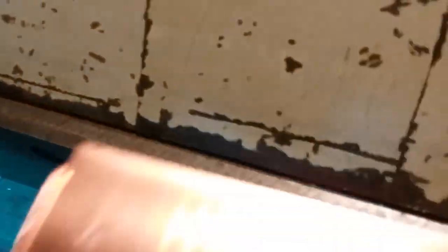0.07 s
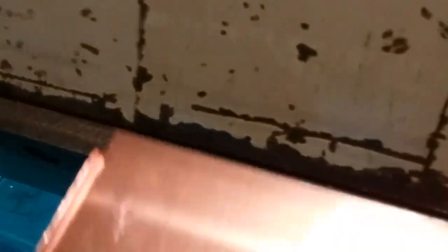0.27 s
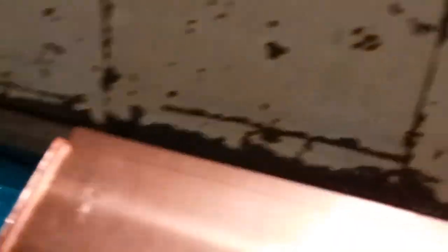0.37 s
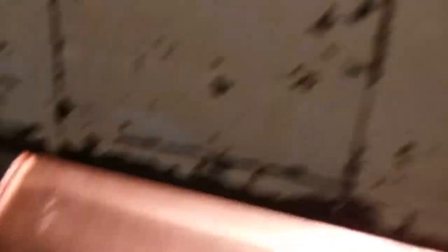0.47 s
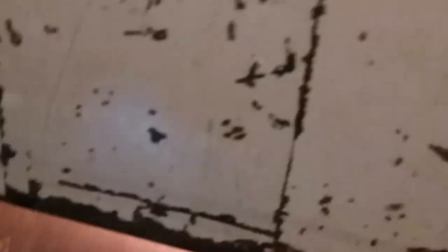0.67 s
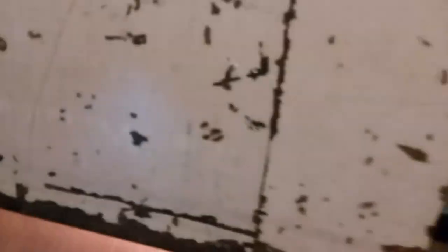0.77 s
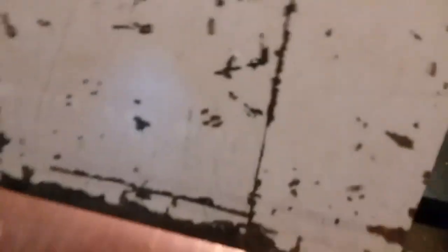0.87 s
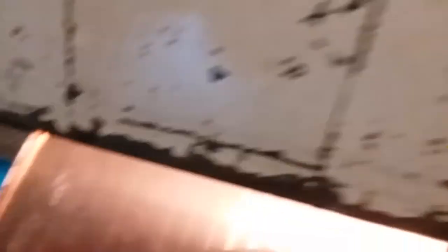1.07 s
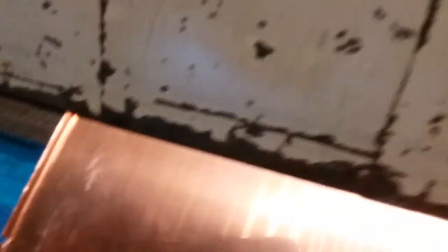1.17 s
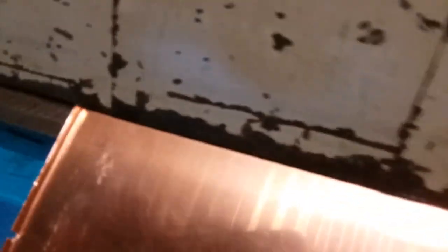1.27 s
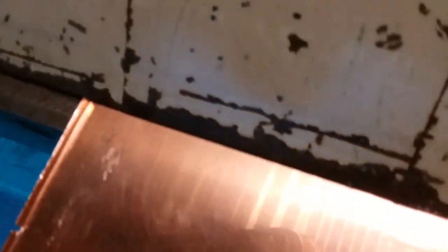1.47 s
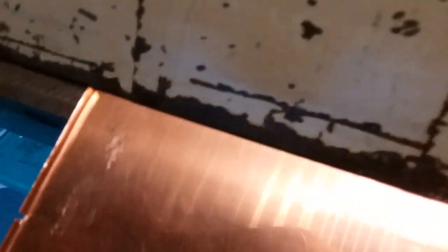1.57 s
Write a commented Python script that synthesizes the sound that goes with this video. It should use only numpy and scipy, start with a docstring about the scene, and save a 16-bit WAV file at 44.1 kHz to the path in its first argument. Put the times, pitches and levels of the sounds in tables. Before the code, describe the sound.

Copper sheet clanks and clatters loudly against a steel bending machine, with brief scrapes and dull knocks.

```python
"""Copper sheet into a bending brake

A copper sheet is slid into a bending brake in a small workshop, close to the microphone.
Its edge scrapes over the steel bed (tiny random slips); it clatters down and clanks against the clamp
(contact pulses, dense noise rings and decaying modes) and booms as it flexes (sagging sines).
A last light blow seats it; a few soft, duller knocks follow over faint rumble and hiss."""
import sys
import numpy as np
from scipy import signal
from scipy.fft import rfft, irfft
from scipy.io import wavfile
from scipy.ndimage import uniform_filter1d

SR = 44100
rng = np.random.default_rng(int(sys.argv[2]) if len(sys.argv) > 2 else 0)


def bounce(signal):
    """Save signal as a 16-bit WAV file at the path given by the first command-line argument."""
    frames = np.transpose(np.atleast_2d(signal))
    limited = np.clip(frames, -1, 1)
    pcm = np.round(limited * 32767).astype(np.int16)
    wavfile.write(sys.argv[1], SR, pcm)


N = 70560  # samples in the scene
SIZE = 32768  # samples in one struck sound
HZ, T = np.fft.rfftfreq(SIZE, 1 / SR), np.arange(SIZE) / SR
STRIKE_RISE_S, FLEX_RISE_S = 0.0003, 0.0024  # time constants of a hard and of a soft onset


def amp(db):
    """Decibels to gain."""
    return 10 ** (np.asarray(db) / 20)


def read(points, hz):
    """A table's value on a log-frequency axis."""
    f, value = np.transpose(points)
    return np.interp(np.log(hz + 1), np.log(f + 1), value)


def add(mix, s, sound):
    """Mixes a sound in at a time in seconds, cut off where the scene ends."""
    start = max(round(s * SR), 0)
    part = mix[:, start:][:, :sound.shape[1]]
    part += sound[:, :part.shape[1]]


def coloured(x, db):
    """Causal minimum-phase filter with gain db at each of HZ."""
    log_gain = np.log(amp(db))
    circle = np.concatenate([log_gain, log_gain[..., -2:0:-1]], -1)
    response = np.exp(np.conj(signal.hilbert(circle)))
    taps = np.fft.ifft(response).real[..., :SIZE // 8]
    return signal.fftconvolve(x, np.atleast_2d(taps), axes=1)[:, :x.shape[1]]


# How alike the two microphones hear a sound. Each row: frequency in Hz, likeness from 0 to 1.
LIKENESS = [(100, 1), (400, 0.77), (900, 0.48), (1600, 0.051), (3000, 0.016), (15000, 0.045)]
ROOM_LIKENESS = 0.88  # factor on the likeness for the room


def noise_pair(size, likeness):
    """Spectra of white noise at two microphones, most alike in the bass."""
    a, b = rfft(rng.standard_normal((2, size)))
    shared = np.clip(likeness * read(LIKENESS, np.fft.rfftfreq(size, 1 / SR)), 0, 1)
    return np.array([a, shared * a + np.sqrt(1 - shared ** 2) * b])


def dense_ring(t60_of, rise_s, db, likeness=1, flutter_db=0, count=8):
    """Countless close modes as noise: each band dies at its own rate, the whole has the spectrum db."""
    noise, centres = noise_pair(SIZE, likeness), np.geomspace(100, 14000, count)
    x = 0
    for centre, weights in zip(centres, np.eye(count)):
        band = irfft(noise * read(np.c_[centres, weights], HZ))
        x = x + band * amp(-60 * T / max(t60_of(centre), 0.005))
    flutter = uniform_filter1d(rng.standard_normal(SIZE), size=120)
    onset = 1 - np.exp(-T / max(rise_s, 1 / SR))
    x = x * onset * amp(flutter_db * flutter / flutter.std())
    # Level the smoothed spectrum before colouring, with wider smoothing towards the treble.
    power = abs(rfft(x)) ** 2
    narrow, wide = uniform_filter1d(power, size=160), uniform_filter1d(power, size=800)
    share = np.minimum(HZ / 4000, 1)
    smooth = abs((1 - share) * narrow + share * wide)
    return coloured(x, db - 10 * np.log10(smooth + 1e-12))


def modes(table, colour):
    """Decaying partials of one object, each as strong as the blow is at its pitch."""
    out = np.zeros((2, SIZE))
    for hz, db, t60 in table:
        rate = np.log(1000) / t60
        phase, apart = rng.uniform(-np.pi, np.pi, 2)
        phases = phase + np.array([[0], [apart * (1 - read(LIKENESS, hz))]])
        # The root keeps a partial's energy the same however long it rings.
        level = amp(db + read(colour, hz)) * 2 * np.sqrt(rate / SR)
        out += level * np.exp(-rate * T) * np.sin(2 * np.pi * hz * T + phases)
    return out


# How long a blow's crash hangs on, by pitch. Each row: frequency in Hz, factor on the blow's ring time.
RING_SCALE = [(100, 3.2), (400, 0.89), (1500, 1.3), (4000, 1.2), (14000, 0.73)]
CONTACT_HZ = 3400  # corner above which the contact pulse loses treble
UNEVEN_DB = 2  # each spot that is struck favours some modes and starves others
RATTLE_DB = 1  # loose contacts make the crash flutter


def strike(colour, contact_db, t60, room_db):
    """The contact pulse, a hand-damped crash of metal and its echo."""
    db = read(colour, HZ)
    contact_colour = db + contact_db - 10 * np.log10(1 + (HZ / CONTACT_HZ) ** 2)
    contact = coloured(signal.unit_impulse((1, SIZE)), contact_colour)
    uneven = uniform_filter1d(rng.standard_normal(len(HZ)), size=50)
    uneven = uniform_filter1d(uneven, size=50)
    crash_colour = db + UNEVEN_DB * uneven / uneven.std()
    crash = dense_ring(lambda f: t60 * read(RING_SCALE, f), STRIKE_RISE_S, crash_colour,
                       flutter_db=RATTLE_DB)
    return contact + crash + workshop(db + room_db)


# Pitches in Hz at which the levels of a blow or a knock are given.
BLOW_HZ = [130, 300, 900, 1500, 2500, 3600, 13000]
# Blows of the sheet. Each row: start in seconds, seven levels in dB (one for each of BLOW_HZ),
# then, relative to those, contact pulse in dB, ring t60 in seconds before RING_SCALE,
# sheet modes in dB, clamp modes in dB, room in dB.
BLOWS = [ (0.2059, 15.5, 11, 10.5, 14, 5, 3, 5.5, -2.5, 0.028, 2, -10, -23),
         (.2140, 11.5, 10, 0.5, 7.5, 5.5, 9.5, 4.5, -8, 0.089, -3, -42, -12),
         (.2270, 2.5, 14, 12, 12, 15, 11, 10, -17.5, 0.13, -2, -12, -15),
         (.2640, 0, 3.5, 9.5, 5, 2.5, -8, -29, -32, 0.049, -20.5, -33, -14.5),
         (0.3546, -2, 7.5, 11.5, 10.5, 10, 0.5, -17, 0, 0.059, -15.5, 2.5, -4),
         (.4510, 5.5, 7, -3, -11, -15, -25.5, -38, -9, 0.48, -21, -15, 2.5),
         (0.5139, 2.5, 9.5, 4.5, 2, 5.5, -12, -15, -4, 0.052, -3, -0.5, -5.5),
         (0.6064, 1, -0.5, -7, -15.5, -14, -20, -37, -22, 0.012, -6, -6, -11),
         (0.8839, -6, 4.5, -5.5, 0.5, -10, -7.5, -11, -27, 0.056, -18, -19, -12.5),
         (0.998, -10, -4, -7.5, -16.5, -19.5, -28.5, -41.5, -7.5, 0.042, -6.5, -1, -13.5)]
# Modes of the sheet. Each row: pitch in Hz, energy in dB relative to the blow, t60 in seconds.
SHEET_MODES = [(134, -30.5, .2), (263, -23.5, 0.1), (311, -26, 0.14), (381.5, -21, 0.15), (843, -22, .2),
               (895, -23.5, 0.33), (994, -19.5, 0.074), (1935, -15, 0.056), (2103, -14.5, 0.06),
               (2980, -15.5, 0.09), (3330, -17.5, .1), (4528, -15, 0.23), (6850, -18, 0.13),
               (7870, -18.5, .075), (14900, -17.5, .08)]
# Modes of the steel clamp. Each row: pitch in Hz, energy in dB relative to the blow, t60 in seconds.
CLAMP_MODES = [(593.6, -26, 0.32), (956, -18.5, 0.1), (1791, -17, 0.049), (2114, -26, 0.15),
               (2940, -20, 0.09)]


def sheet_blows():
    """The sheet lands, bounces and flexes, ringing itself and the clamp."""
    out = np.zeros((2, N))
    for s, *levels, contact_db, t60, sheet_db, clamp_db, room_db in BLOWS:
        colour = np.c_[BLOW_HZ, levels]
        sheet = amp(sheet_db) * modes(SHEET_MODES, colour)
        clamp = amp(clamp_db) * modes(CLAMP_MODES, colour)
        add(out, s, strike(colour, contact_db, t60, room_db) + sheet + clamp)
    return out


# Short slaps of the rebounding edge. Each row: start in seconds, level in dB.
REBOUNDS = [(0.207, 10.5), (.2272, 11.5), (0.2814, -7), (.731, -20), (0.8828, -6), (0.927, -17),
            (1.036, -20)]
# Tone of the hardest slap. Each row: frequency in Hz, gain in dB.
REBOUND_COLOUR = [(300, 0.5), (1000, 0), (2400, -3), (4500, -15.5), (13000, -19.5)]
REBOUND_CONTACT_DB, REBOUND_ROOM_DB = -7, -13.5
REBOUND_T60 = 0.03  # s, before RING_SCALE
REBOUND_DULLING = 0.27  # dB per octave of treble lost for each dB that a slap is softer
DULL_FROM_HZ = 1000


def rebounds():
    """The loose edge slaps back and chatters between the blows; the gentler the slap, the duller."""
    out, hardest_db = np.zeros((2, N)), max(db for s, db in REBOUNDS)
    for s, db in REBOUNDS:
        dulling = REBOUND_DULLING * (hardest_db - db)  # dB per octave
        colour = [(hz, level + db - dulling * np.log2(max(hz / DULL_FROM_HZ, 1)))
                  for hz, level in REBOUND_COLOUR]
        add(out, s, strike(colour, REBOUND_CONTACT_DB, REBOUND_T60, REBOUND_ROOM_DB))
    return out


# Strongest partial of a struck spot. Each row: start in seconds, pitch in Hz, level in dB, t60 in seconds.
CLINKS = [(0.3541, 1436, -11.5, 0.041), (0.5143, 2483, -25.5, 0.1), (.5144, 1964, -37, 0.15),
          (.885, 890, -38, 0.1), (0.887, 1443, -40.5, .06), (1.395, 1494, -53.5, 0.056)]
CLINK_LEAD_RAD = 0.61  # phase by which the left microphone leads


def clinks():
    """A hard contact sets one partial of the struck spot ringing above the rest."""
    out, lead = np.zeros((2, N)), np.array([[CLINK_LEAD_RAD], [0]])
    onset = 1 - np.exp(-T / STRIKE_RISE_S)
    for s, hz, db, t60 in CLINKS:
        add(out, s, amp(db - 60 * T / t60) * onset * np.sin(2 * np.pi * hz * T + lead))
    return out


# Blurred rings of the flexing sheet.
# Each row: start in seconds, pitch in Hz before it sags, level in dB, t60 in seconds.
SHIMMERS = [(.356, 2010, -34.5, .3), (0.5143, 2560, -39, 0.25), (.607, 2577, -61.5, 1.2),
            (.607, 605, -55, 1.45)]
SHIMMER_OCTAVES = 0.18  # distance from the centre at which the band has dropped to 1/e
SHIMMER_SAG, RELAX_S = 0.18, 0.054  # share by which the pitch falls, time constant of the fall


def shimmers():
    """A cluster of close partials rings on as one blurred band, sagging as the sheet relaxes."""
    out = np.zeros((2, N))
    for s, hz, db, t60 in SHIMMERS:
        octaves = np.log2((HZ + 1) / hz)
        spectrum = noise_pair(SIZE, 0.93) * np.exp(-(octaves / SHIMMER_OCTAVES) ** 2)
        band = signal.hilbert(irfft(spectrum))
        sag_hz = hz * SHIMMER_SAG * (1 - np.exp(-T / RELAX_S))
        ring = (band * np.exp(-2j * np.pi * np.cumsum(sag_hz) / SR)).real
        envelope = amp(db - 60 * T / t60) * (1 - np.exp(-T / FLEX_RISE_S))
        add(out, s, ring / ring.std() * envelope)
    return out


# Low booms as the sheet flexes.
# Each row: start in seconds, pitch in Hz before it sags, level in dB, t60 in seconds.
BOOMS = [(0.4509, 246, -18, 0.039), (0.465, 295, -35, 0.07), (0.4976, 236, -20.5, 0.045),
         (0.514, 214.2, -37.5, 0.37), (.886, 151, -38, 0.11), (0.892, 348, -33.5, 0.029),
         (0.9989, 252, -50, 0.16), (1.2439, 257.6, -46, 0.083)]
BOOM_SAG_PER_S = 1.152  # exponential rate at which the pitch falls


def booms():
    """The whole sheet bows and springs back, its pitch sagging as it relaxes."""
    out = np.zeros((2, N))
    for s, hz, db, t60 in BOOMS:
        turns = np.cumsum(hz * np.exp(-BOOM_SAG_PER_S * T)) / SR
        envelope = amp(db - 60 * T / t60) * (1 - np.exp(-T / FLEX_RISE_S))
        add(out, s, (envelope * np.sin(2 * np.pi * turns))[None])
    return out


# Scrapes of the sheet's edge. Each row: loudest moment in seconds, swell and fade time constants
# in seconds, level in dB, treble tilt in dB per octave.
SCRAPES = [(.001, 0.027, 0.024, -41.5, -2), (0.096, 0.037, 0.031, -43, -2.5),
           (0.13, 0.05, 0.026, -40.5, 1.5), (0.501, 0.004, 0.017, -40.5, 1),
           (0.602, 0.0065, 0.0042, -43, -1.5)]
# Tone of a scrape before its tilt. Each row: frequency in Hz, gain in dB.
SCRAPE_COLOUR = [(400, 5), (1000, 4), (2800, 4.5), (4500, -0.5), (8000, -2.5), (15000, -5)]
SCRAPE_T60, SCRAPE_ROOM_DB = 0.026, -9.5  # ring of each slip in s, level of the echo
TILT_FROM_HZ, TILT_PIVOT_HZ = 1000, 4000  # the tilt acts from here up, and is 0 dB at the pivot
SLIPS_PER_S, SLIP_SPREAD_DB = 2800, 2  # mean rate of slips, scale of their random extra level


def scrapes():
    """The edge slips over the bed in thousands of tiny catches a second, each ringing briefly."""
    out, t = np.zeros((2, N)), np.arange(N) / SR
    tilt_octaves = np.log2(np.maximum(HZ, TILT_FROM_HZ) / TILT_PIVOT_HZ)
    for s, swell_s, fade_s, db, tilt_db in SCRAPES:
        slips = (rng.random(N) < SLIPS_PER_S / SR) * rng.standard_normal(N)
        slips = slips * amp(SLIP_SPREAD_DB * np.minimum(rng.exponential(1, N), 4))
        stroke = amp(db) * np.exp(-np.maximum((s - t) / swell_s, (t - s) / fade_s))
        colour = read(SCRAPE_COLOUR, HZ) + tilt_db * tilt_octaves
        body = dense_ring(lambda f: SCRAPE_T60, STRIKE_RISE_S, colour)
        out += signal.fftconvolve((stroke * slips / slips.std())[None], body, axes=1)[:, :N]
    echo = signal.fftconvolve(out, workshop(SCRAPE_ROOM_DB), axes=1)[:, :N]
    return out + echo


# Soft knocks at the machine. Each row: start in seconds, seven levels in dB (one for each of BLOW_HZ),
# ring t60 in seconds before RING_SCALE, room in dB relative to the knock.
KNOCKS = [ (1.1487, -22, -11, -12, -16, -23.5, -25, -42.5, 0.26, -3),
          (1.2434, -19, -21.5, -14, -20.5, -33.5, -35, -48, 0.052, -10),
          (1.3950, -18.5, -25, -16, -21, -38.5, -46, -54, 0.027, -3),
          (1.5011, -27, -13, -14.5, -18, -27.5, -33, -47.5, 0.18, -3)]
# Hollow resonances under the knocks.
# Each row: pitch in Hz, energy in dB relative to the knock, t60 in seconds.
KNOCK_MODES = [(523.4, -18, 0.16), (651, -18.5, 0.13), (778, -21, 0.21), (990, -22.5, 0.22),
               (1480, -30.5, .12), (2132, -16, 0.2)]
KNOCK_CONTACT_DB = -8.5  # contact pulse relative to the knock


def knocks():
    """Dull knocks: a soft contact and crash with a short, hollow ring."""
    out = np.zeros((2, N))
    for s, *levels, t60, room_db in KNOCKS:
        colour = np.c_[BLOW_HZ, levels]
        add(out, s, strike(colour, KNOCK_CONTACT_DB, t60, room_db) + modes(KNOCK_MODES, colour))
    return out


# Partials still ringing from an earlier touch. Each row: pitch in Hz, level in dB, t60 in seconds.
RINGING = [(117, -46.5, 0.28), (936, -39.5, .3)]


def ringing():
    """The sheet's last few partials die away exponentially from the start."""
    out, t = np.zeros(N), np.arange(N) / SR
    for hz, db, t60 in RINGING:
        decay = np.exp(-np.log(1000) * t / t60)
        out += amp(db) * decay * np.sin(2 * np.pi * (hz * t + rng.random()))
    return out


# Decay of the room. Each row: frequency in Hz, t60 in seconds.
ROOM_T60 = [(100, .9), (300, 0.91), (600, 0.32), (1200, 0.074), (2300, 0.63), (3300, 0.2), (8000, 0.83),
            (15000, 0.081)]
# Tone of the room. Each row: frequency in Hz, gain in dB.
ROOM_COLOUR = [(100, 1.5), (300, 4.5), (900, 0), (2200, 2.5), (4000, -1), (14000, -6)]
ROOM_RISE_S = 0.0049  # time constant of the echo's onset


def workshop(db):
    """The room's diffuse answer to a blow with the spectrum db."""
    colour = db + read(ROOM_COLOUR, HZ)
    return dense_ring(lambda f: read(ROOM_T60, f), ROOM_RISE_S, colour, ROOM_LIKENESS)


# Spectrum of the room tone. Each row: frequency in Hz, level in dB.
FLOOR = [(25, -48.5), (60, -44), (120, -48), (300, -57.5), (1000, -56.5), (2000, -67), (4000, -69),
         (9000, -73), (15000, -76)]


def room_tone():
    """Faint steady rumble and hiss of the workshop, as coloured noise."""
    gain = amp(read(FLOOR, np.fft.rfftfreq(N, 1 / SR)))
    return irfft(noise_pair(N, ROOM_LIKENESS) * gain, N)


# Balance of the microphone pair. Each row: frequency in Hz, left minus right in dB.
PAN = [(100, -2.5), (400, -3), (900, -2.5), (1500, 6.5), (2100, 8.5), (2600, -2), (4500, 2), (8000, -4.5),
       (12000, 0)]


def scene():
    """All sources, as they reach the two microphones."""
    sheet = sheet_blows() + rebounds() + clinks() + shimmers() + booms() + scrapes()
    mix = sheet + knocks() + ringing() + room_tone()
    pan_db = read(PAN, HZ) / 2
    return coloured(mix, np.array([pan_db, -pan_db]))


# Colour of the microphones. Each row: frequency in Hz, gain in dB.
MIC = [(20, -32), (50, -17), (90, 0.22), (380, 0.5), (500, -4), (700, -1), (1000, 0.01), (3000, 0.2),
       (3600, -1), (6500, -2), (8200, 1.75), (9300, -6), (12000, -1), (15300, 2.99)]
CUTOFF_HZ = 15900  # top of the band


def record(dry):
    """Microphone colour, then a steep low-pass as the band limit."""
    low_pass = signal.firwin(401, CUTOFF_HZ, window=("kaiser", 8), fs=SR)
    return signal.oaconvolve(coloured(dry, read(MIC, HZ)), low_pass[None], "same")


dry = scene()
out = record(dry)
bounce(out)
```